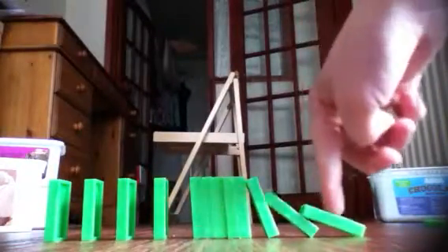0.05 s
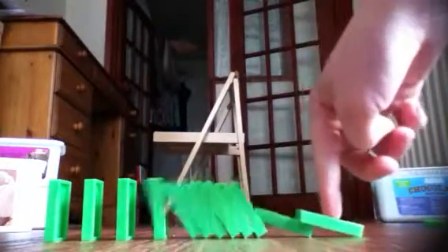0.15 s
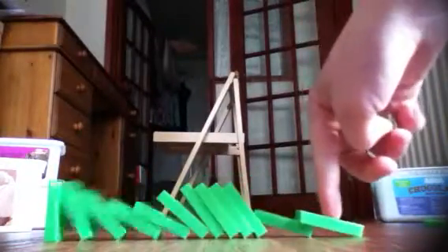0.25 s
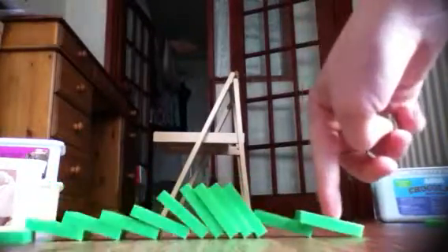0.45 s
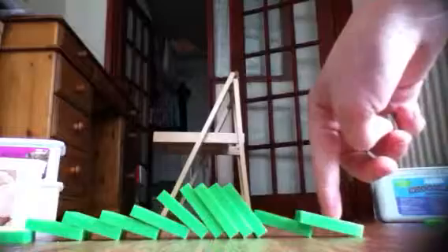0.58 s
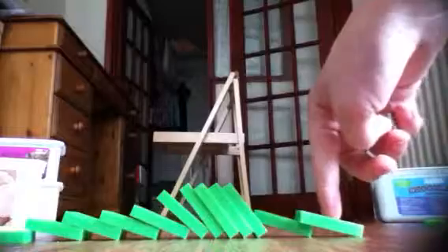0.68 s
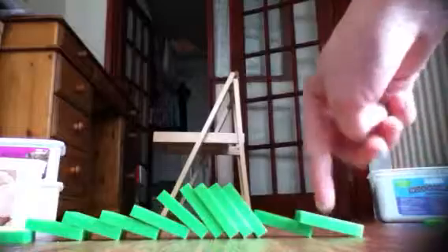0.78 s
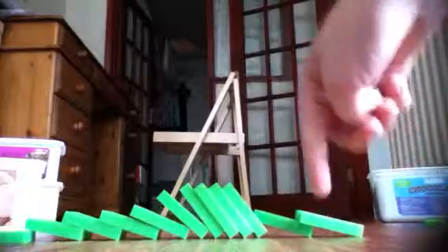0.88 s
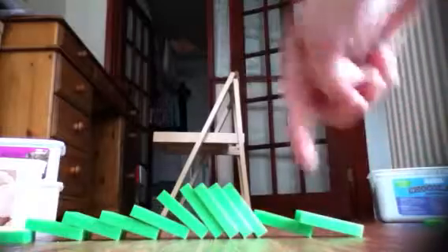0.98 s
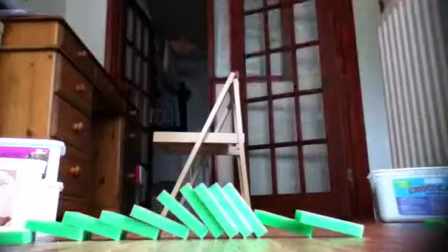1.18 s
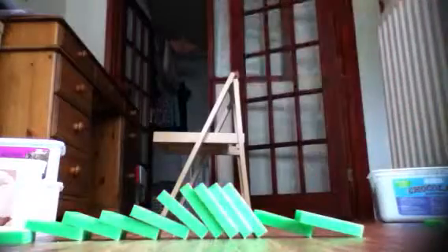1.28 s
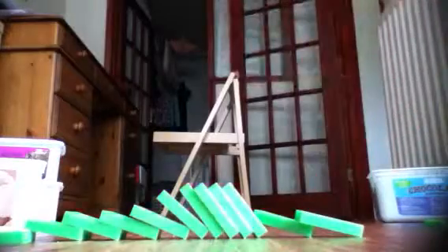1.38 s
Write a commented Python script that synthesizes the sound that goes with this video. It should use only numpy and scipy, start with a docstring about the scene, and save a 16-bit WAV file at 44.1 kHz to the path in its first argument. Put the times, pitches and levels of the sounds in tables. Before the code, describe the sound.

Close to the microphone, small dominoes fall in a rapid run of sharp clacks on wooden boards indoors. A last slap and a few weaker clicks follow, then only faint room hiss remains.

```python
"""A quick, bright clatter: a short row of plastic dominoes topples on a wooden living-room floor,
close to the microphone. Each contact cracks and sets three modes of a tile ringing; landing tiles
knock and slap on the boards, and the last ones chatter against a plastic tub. The room rings briefly
and a hand rustles faintly over rumble and hiss. The recorder's gain control ducks on the loud hits
and slowly lets the background back."""
import sys
import numpy as np
from scipy import signal
from scipy.fft import rfft, irfft, next_fast_len
from scipy.io import wavfile
from scipy.ndimage import uniform_filter1d

SR = 44100
rng = np.random.default_rng(int(sys.argv[2]) if len(sys.argv) > 2 else 0)


def wav_record(signal):
    """Record a signal, one row per channel, as 16-bit PCM in the file named by sys.argv[1]."""
    frames = np.transpose(np.atleast_2d(signal))
    bounded = np.clip(frames, -1, 1)
    # unit amplitude maps onto the largest positive 16-bit level
    quanta = np.round(bounded * 32767).astype(np.int16)
    wavfile.write(sys.argv[1], SR, quanta)


N = 63945
T = np.arange(N) / SR
HIT_T = T[:SR // 6]   # time axis of one hit

# Tile on tile, close to the microphone, with three ringing modes:
# start_s, low_hz, middle_hz, low_db, middle_db, high_db, t60_s, crack_db
TILE_CONTACTS = [ (.2060, 5103, 8040, -46.5, -60, -59.5, .015, -54.5),
                 (0.2145, 4700, 7700, -41.5, -52.5, -49, .012, -39),
                 (0.218, 4910, 8000, -23, -38, -41.5, .02, -37),
                 (.2328, 4940, 7940, -26.5, -41.5, -39, 0.012, -35.5),
                 (0.2351, 4860, 8350, -19, -30.5, -26, 0.012, -29),
                 (.2376, 4916, 8300, -8.5, -25, -13.5, 0.015, -30),
                 (0.2402, 4504, 8560, -14.5, -27.5, -18.5, 0.024, -22.5),
                 (0.2442, 5000, 7900, -5, -27, -18.5, 0.011, -23),
                 (.2475, 4644, 8600, -15.5, -24, -25.5, 0.012, -30),
                 (0.2524, 4220, 7800, -12, -24.5, -22.5, 0.0058, -23),
                 (.2530, 4610, 8470, -11, -27.5, -23.5, 0.021, -30),
                 (.2597, 4650, 7275, -12.5, -18, -14.5, 0.015, -15.5),
                 (0.2629, 4805, 7700, -10.5, -15.5, -7, .022, -15.5),
                 (.2665, 4880, 7778, -16.5, -17.5, -12.5, .022, -18),
                 (0.2719, 4770, 8066, -7, -18, -18.5, 0.022, -15),
                 (0.2907, 4786, 8010, -24.5, -38, -32.5, .025, -32.5),
                 (.3025, 4833, 8060, -23.5, -45, -38, 0.028, -40),
                 (0.3151, 4540, 8170, -20, -30.5, -31, .02, -23),
                 (.3168, 4843, 8020, -10, -25, -16.5, .045, -17.5),
                 (.3255, 4738, 8035, -13, -24, -29, .045, -23),
                 (.3355, 4740, 8154, -19.5, -35.5, -44, 0.032, -35),
                 (0.342, 4710, 8053, -33.5, -32.5, -34, .02, -36),
                 (.3640, 4980, 8177, -11.5, -24, -4, 0.0091, -14),
                 (.3648, 4882, 8137, -23, -5, -16.5, 0.04, -26.5),
                 (.3770, 4974, 8200, -37, -31.5, -15.5, .025, -49.5),
                 (0.393, 4912, 8220, -17, -26, -29, .03, -17.5),
                 (0.3972, 4914, 8154, -9.5, -4.5, -11, 0.038, -14.5),
                 (.4100, 4814, 7896, -11, -3, -11.5, .024, -9),
                 (0.4139, 5030, 8340, -24.5, -12.5, -33, .02, -26),
                 (0.4205, 4750, 8100, -16.5, -34, -25, 0.034, -30),
                 (.4330, 4864, 8226, -23.5, -37.5, -36, 0.035, -38),
                 (.4430, 4830, 7875, -25.5, -35, -32, 0.043, -23.5),
                 (.4478, 5160, 7960, -22, -27, -41, 0.023, -26),
                 (.4565, 5056, 8040, -20, -23.5, -37, 0.068, -21),
                 (.4630, 4900, 8300, -43, -30, -39, 0.048, -13.5),
                 (.4665, 4977, 7960, -18.5, -18.5, -24.5, 0.1, -19.5),
                 (.4780, 5240, 7980, -15, -12.5, -33, 0.02, -11.5),
                 (0.4797, 4840, 7740, -2, -28, -27, 0.012, -13.5),
                 (.4970, 4960, 7967, -47, -37, -28.5, 0.046, -24),
                 (.5335, 4920, 8048, -34, -40, -31.5, 0.046, -22),
                 (.5540, 4970, 8200, -24, -31, -37, 0.03, -55),
                 (0.5569, 5130, 7570, -35, -30, -31, 0.013, -32),
                 (.5760, 5010, 8100, -37, -54, -56, .02, -59)]
# Faint ticks as the heap settles: start_s, level_db
SETTLING_TICKS = [(.7503, -56.5), (.767, -70), (1.075, -59.5), (1.213, -55)]
# Tone of a contact's crack: frequency_hz, relative_db
CRACK_SPECTRUM = [(300, -32.5), (1000, -21), (2500, -11.5), (4500, 0.5), (6500, 0), (8200, 2), (9400, -1.5),
                  (11200, -5), (12500, -17.5), (16000, -24.5)]
# Tone of the bright snap on top of a hard contact: frequency_hz, relative_db
SNAP_SPECTRUM = [(1000, -41), (8000, -15), (11500, -0.5), (13500, -1.5), (16000, -3.5)]


def tiles(high_mode_hz=10777, crack_t60_s=.01):
    """Each contact cracks and rings three modes; a tile pressed by its neighbours rings briefly."""
    rings, cracks, snaps = np.zeros((3, N))
    for start_s, low_hz, middle_hz, low_db, middle_db, high_db, t60_s, crack_db in TILE_CONTACTS:
        high_hz = high_mode_hz * (1 + .012 * rng.uniform(-1, 1))
        add(rings, start_s, mode(low_hz, low_db, t60_s))
        add(rings, start_s, mode(middle_hz, middle_db, .97 * t60_s))
        add(rings, start_s, mode(high_hz, high_db, .85 * t60_s))
        add(cracks, start_s, from_db(crack_db) * burst(crack_t60_s))
        add(snaps, start_s, from_db(high_db - 10.5) * burst(crack_t60_s))   # follows the high mode
    for start_s, level_db in SETTLING_TICKS:
        add(cracks, start_s, from_db(level_db) * burst(crack_t60_s))
    return rings + colour(cracks, CRACK_SPECTRUM) + colour(snaps, SNAP_SPECTRUM)


# Tiles landing on the floor by the microphone: start_s, level_db
FLOOR_KNOCKS = [(0.205, -39.5), (0.2161, -33), (0.2203, -32), (0.222, -35.5), (0.2312, -26.5),
                (0.2353, -26.5), (0.2385, -21), (0.2442, -14.5), (0.2514, -16), (0.2606, -16.5),
                (.2665, -22), (.2722, -24.5), (0.2908, -37), (0.3171, -28), (0.3356, -33), (.364, -37.5),
                (0.3967, -32.5), (.410, -36.5), (0.442, -37), (.4565, -37.5), (0.4648, -35), (.478, -13.5),
                (0.4788, -16), (0.5344, -37)]
# Modes of a floorboard: pitch_hz, relative_db, t60_s
BOARD_MODES = [(680, -33, 0.01), (1143, -25, .014), (1490, -18, .014), (2090, -15, .014), (2550, -10, .016),
               (3100, -14, .016), (3704, -12.5, 0.02)]
# Tone of the thud on wood: frequency_hz, relative_db
THUD_SPECTRUM = [(100, -8.5), (400, -20.5), (800, -12.5), (1500, 2), (2500, 10.5), (4000, 6), (6000, -8.5),
                 (12000, -29)]


def floorboards(thud_gain_db=-6.5):
    """A landing tile gives a short thud and rings the wood."""
    rings, thuds = np.zeros((2, N))
    for start_s, level_db in FLOOR_KNOCKS:
        add(thuds, start_s, from_db(level_db + thud_gain_db) * burst(t60_s=.0078))
        add(rings, start_s, strike(BOARD_MODES, level_db, spread=.064))
    return rings + colour(thuds, THUD_SPECTRUM)


# Tiles landing flat, heard close up: start_s, relative_db
FLAT_LANDINGS = [(.2143, -33.5), (.2597, -15.5), (.364, -28), (.3975, -34), (.410, -29.5), (.478, -9.5),
                 (.4798, -26.5), (.5337, -27)]
# Tone of the slap: frequency_hz, relative_db
SLAP_SPECTRUM = [(100, -19.5), (400, -15.5), (800, -5.5), (2200, 6.5), (4000, 0.5), (8000, -1.5),
                 (11000, -12), (14000, -28)]


def slaps(gain_db=7):
    """A flat landing sends out a single sharp pressure pulse."""
    pulses = np.zeros(N)
    for start_s, relative_db in FLAT_LANDINGS:
        add(pulses, start_s, from_db([relative_db + gain_db]))
    return colour(pulses, SLAP_SPECTRUM)


# Modes of the plastic tub at the end of the row: pitch_hz, relative_db, t60_s
TUB_MODES = [(2490, -6, .018), (2834, -3.5, 0.024), (3315, -1.5, 0.023), (3810, -1.5, 0.019),
             (4380, -7.5, .025)]


def tub(start_s=.2615, hit_db=-12.5, chatter_db=-28, gap_s=.0045, fall_db_per_s=170, low_cut_hz=1300):
    """One firm hit, then uneven touches that die away; the hollow tub rings lower than a tile."""
    rings = np.zeros(N)
    delays_s = gap_s * (np.arange(1, 21) + rng.uniform(-.5, .5, size=20))
    touches_db = chatter_db - fall_db_per_s * delays_s
    for delay_s, level_db in [(0, hit_db), *zip(delays_s, touches_db)]:
        add(rings, start_s + delay_s, strike(TUB_MODES, level_db, spread=.035))
    low_cut = signal.butter(2, low_cut_hz, "high", fs=SR, output="sos")   # little bass under the tub's ring
    return signal.sosfilt(low_cut, rings)


# Decay of the living room, with no tail where it falls below zero: frequency_hz, t60_s
ROOM_DECAY = [(300, 0.13), (1500, 0.29), (3000, 0.2643), (5000, 0.34), (8000, 0.26), (11000, 0.2648),
              (16000, -0.1)]
# Strength of the room's tail at the microphone: frequency_hz, level_db
ROOM_TAIL = [(300, -8.5), (1000, -9), (2000, -14.5), (3400, -8.5), (5000, -12.5), (8000, -17),
             (11000, -13.5), (16000, -21.5)]


def room(direct, scatter_db=-6, scatter_t60_s=.034, tail_delay_s=.0077, tail_build_s=.016):
    """Quick scatter from the floor and nearby tiles, then a diffuse tail that dies band by band."""
    hz = np.fft.rfftfreq(N, 1 / SR)
    white = rfft(rng.standard_normal(N))
    swell = 1 - np.exp(-np.maximum(T - tail_delay_s, 0) / tail_build_s)
    response = from_db(scatter_db) * unit_energy(rng.standard_normal(N) * decay(T, scatter_t60_s))
    edges_hz = np.geomspace(150, 18000, 15)
    for low_hz, high_hz in zip(edges_hz, edges_hz[1:]):
        centre_hz = np.sqrt(low_hz * high_hz)
        band = irfft(white * ((hz >= low_hz) & (hz < high_hz)), N)
        envelope = unit_energy(swell * decay(T, at_hz(ROOM_DECAY, centre_hz)))
        response += from_db(at_hz(ROOM_TAIL, centre_hz)) * band * envelope
    return signal.fftconvolve(direct, response)[:N]


# Tone of the hand's faint rustle: frequency_hz, relative_db
RUSTLE_SPECTRUM = [(100, -9.5), (350, 2), (1000, -1.5), (1900, -1.5), (3500, -17), (10000, -21)]


def hand_rustle(peak_s=1.173, half_width_s=.085, level_db=-70):
    """One soft swell of friction noise as the hand draws back."""
    swell = np.exp(-((T - peak_s) / half_width_s) ** 2)
    return from_db(level_db) * swell * colour(rng.standard_normal(N), RUSTLE_SPECTRUM)


# Living-room tone and the microphone's own noise: frequency_hz, relative_db
BACKGROUND_SPECTRUM = [(20, -0.5), (65, 0.5), (110, -7.5), (200, -12), (400, -17.5), (800, -21.5),
                       (2000, -25), (5000, -28), (10000, -28.5), (15000, -33), (16500, -42.5)]


def background(level_db=-59.5):
    """Low room rumble under an even microphone hiss."""
    return from_db(level_db) * colour(rng.standard_normal(N), BACKGROUND_SPECTRUM)


def strike(modes, level_db, spread):
    """One blow on a body; the modes shift a little with the spot that is hit."""
    signs = rng.choice([-1, 1], len(modes))
    detunes = 1 + spread * rng.uniform(-1, 1, len(modes))
    return sum(sign * mode(pitch_hz * detune, level_db + relative_db, t60_s)
               for (pitch_hz, relative_db, t60_s), sign, detune in zip(modes, signs, detunes))


def mode(pitch_hz, level_db, t60_s, contact_s=.0002):
    """One struck mode; it swells while the contact lasts, then rings down."""
    swell = 1 - np.exp(-HIT_T / contact_s)
    return from_db(level_db) * np.sin(2 * np.pi * pitch_hz * HIT_T) * decay(HIT_T, t60_s) * swell


def burst(t60_s):
    """A dying puff of noise that starts at an rms of about one."""
    envelope = decay(HIT_T, t60_s)
    return unit_energy(rng.standard_normal(len(HIT_T)) * envelope) * np.sqrt(np.sum(envelope ** 2))


def colour(x, spectrum):
    """Minimum-phase filter that keeps the power of white noise."""
    size = 2 * next_fast_len(N)
    gain = from_db(at_hz(spectrum, np.fft.rfftfreq(size, 1 / SR)))
    gain /= np.sqrt(np.mean(gain ** 2))
    cepstrum = irfft(np.log(gain))
    cepstrum[1:size // 2] *= 2   # fold onto positive time, so nothing sounds ahead of a hit
    cepstrum[size // 2 + 1:] = 0
    return irfft(rfft(x, size) * np.exp(rfft(cepstrum)))[:N]


def decay(t, t60_s):
    """Exponential fall of 60 dB in t60_s."""
    return np.exp(-np.log(1000) * t / max(t60_s, 1e-4))


def at_hz(points, hz):
    """Read a table on a log-frequency axis."""
    points_hz, values = np.transpose(points)
    return np.interp(np.log(np.maximum(hz, 1)), np.log(points_hz), values)


def from_db(db):
    """Decibels to gain."""
    return 10 ** (np.asarray(db) / 20)


def unit_energy(x):
    """Scale to an energy of one."""
    return x / np.sqrt(np.sum(x ** 2) + 1e-20)


def add(track, start_s, sound):
    """Mix a sound in at start_s."""
    start = int(start_s * SR)
    track[start:start + len(sound)] += sound[:N - start]


def scene():
    """At the microphone, in mono: the falling row up close, the living room behind it."""
    fall = tiles() + floorboards() + slaps() + tub()
    return (fall + room(fall) + hand_rustle() + background())[None]


def record(dry):
    """The recorder's gain control ducks fast and recovers slowly; a steep filter cuts the top."""
    mic_gain_db, cutoff_hz = 6, 16000
    threshold_db, attack_s, release_db_per_s = -14, .0021, 6.5
    mic = dry * from_db(mic_gain_db)
    power = uniform_filter1d(mic[0] ** 2, size=220)   # 5 ms average
    level_db = 10 * np.log10(np.maximum(power, 1e-12))
    excess_db = np.maximum(level_db - threshold_db, 0)
    recovery_db = release_db_per_s * T
    held_db = np.maximum.accumulate(excess_db + recovery_db) - recovery_db   # each peak drains away
    pole = np.exp(-1 / (attack_s * SR))
    duck_db = signal.lfilter([1 - pole], [1, -pole], held_db)
    low_pass = signal.ellip(10, .2, 80, cutoff_hz, fs=SR, output="sos")
    return signal.sosfilt(low_pass, mic * from_db(-duck_db))


dry = scene()
out = record(dry)
wav_record(out)
```